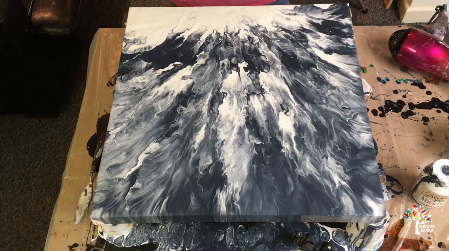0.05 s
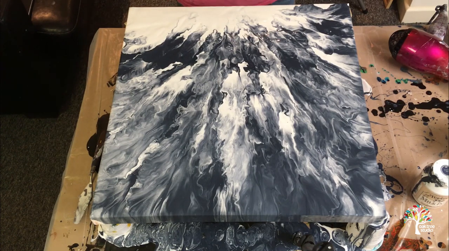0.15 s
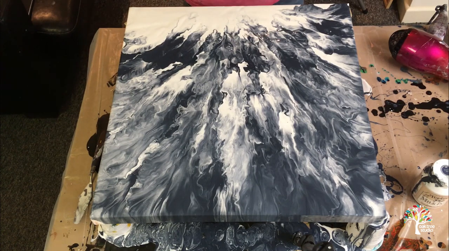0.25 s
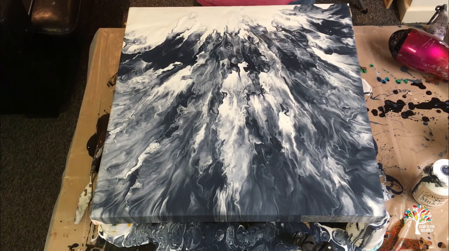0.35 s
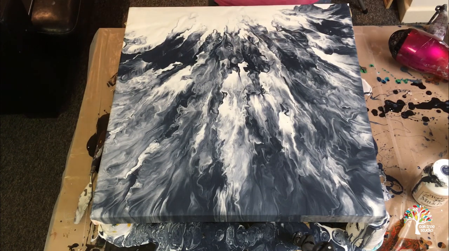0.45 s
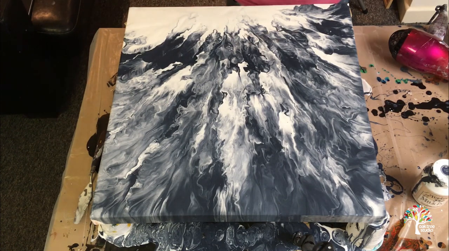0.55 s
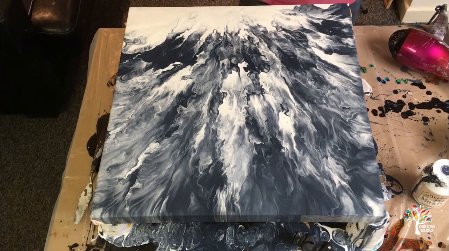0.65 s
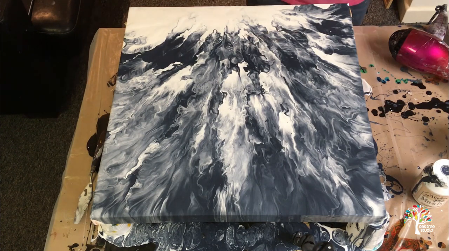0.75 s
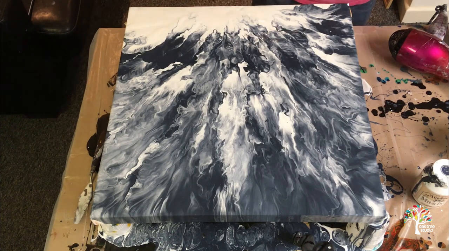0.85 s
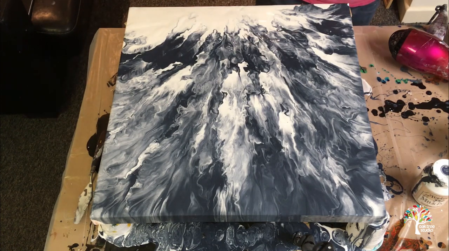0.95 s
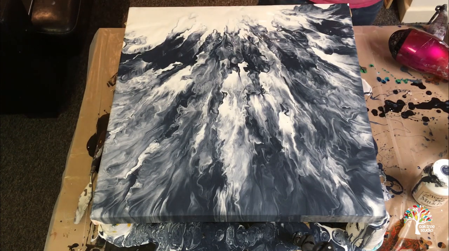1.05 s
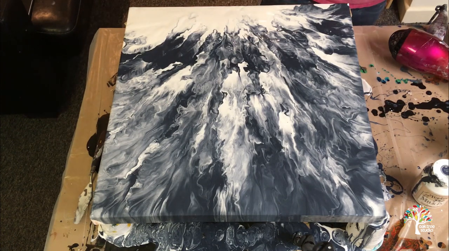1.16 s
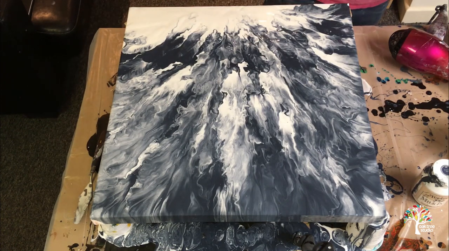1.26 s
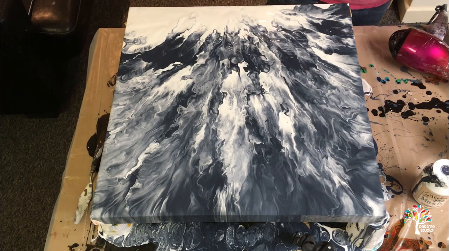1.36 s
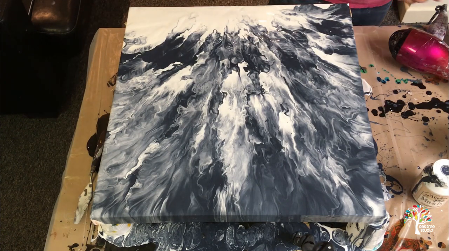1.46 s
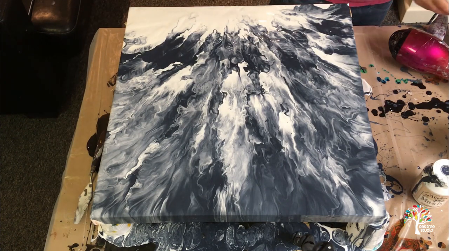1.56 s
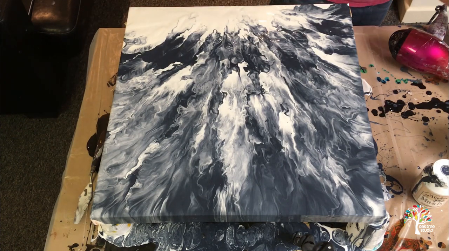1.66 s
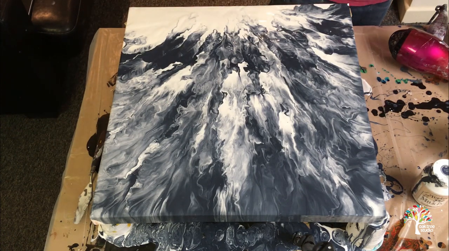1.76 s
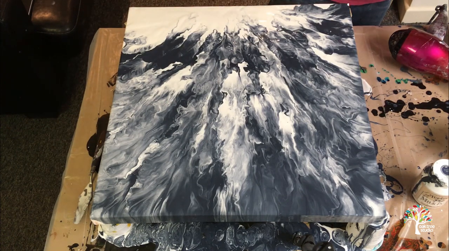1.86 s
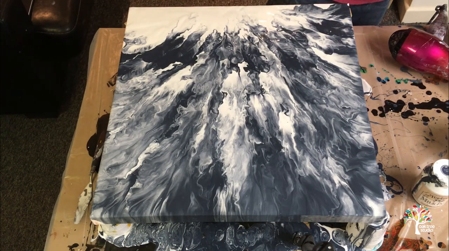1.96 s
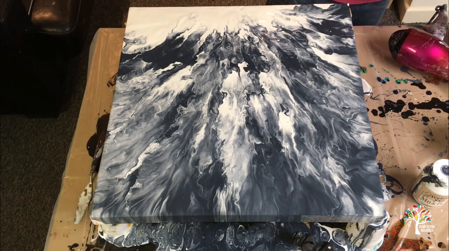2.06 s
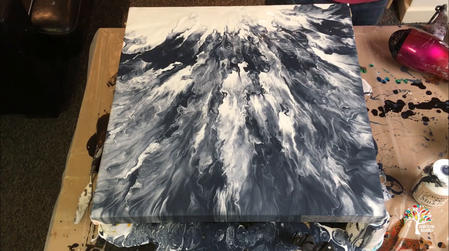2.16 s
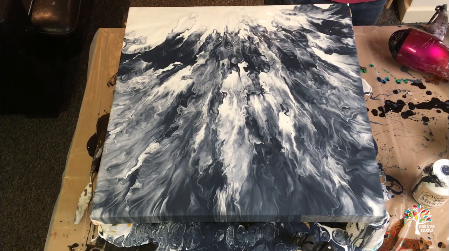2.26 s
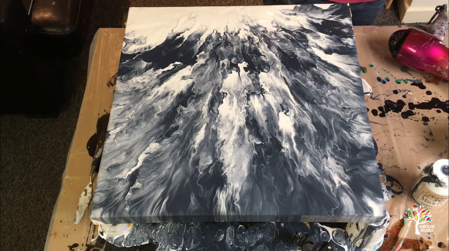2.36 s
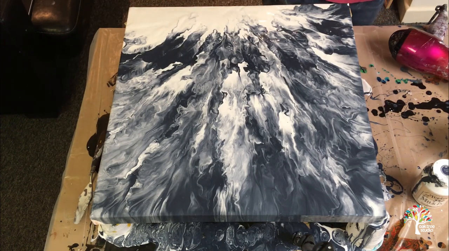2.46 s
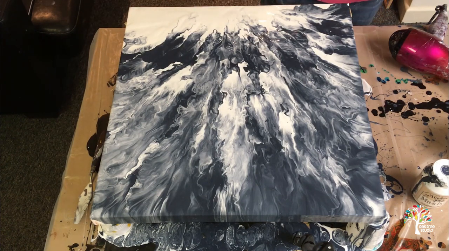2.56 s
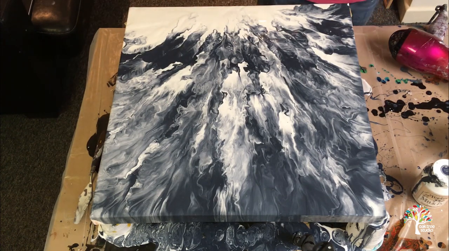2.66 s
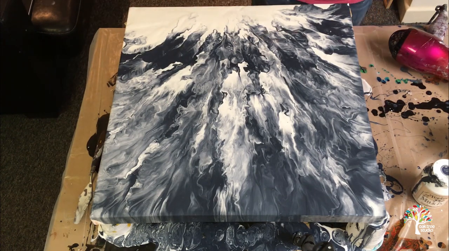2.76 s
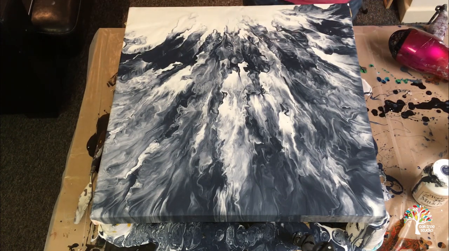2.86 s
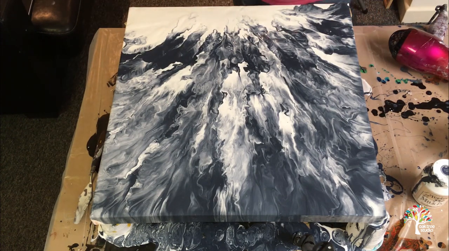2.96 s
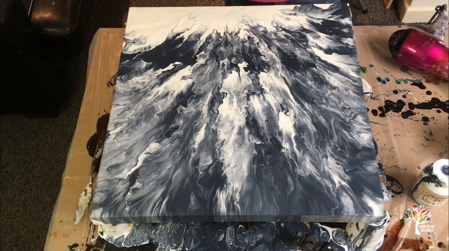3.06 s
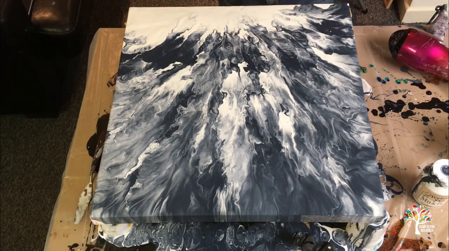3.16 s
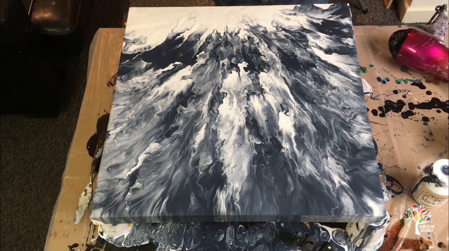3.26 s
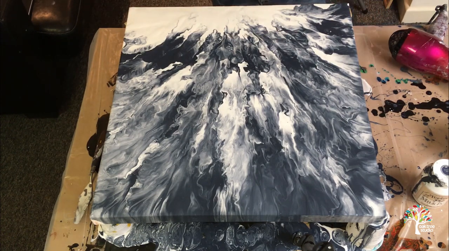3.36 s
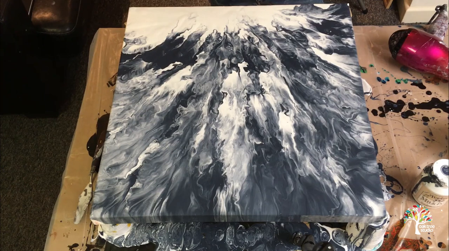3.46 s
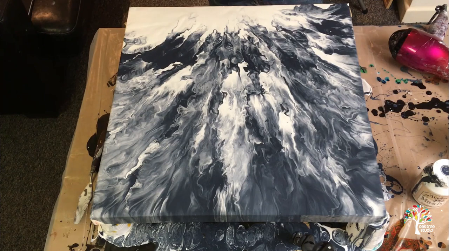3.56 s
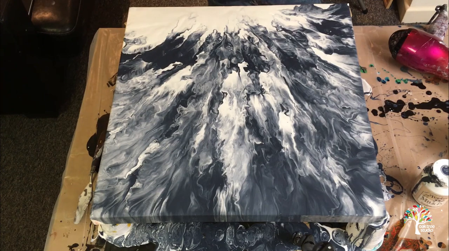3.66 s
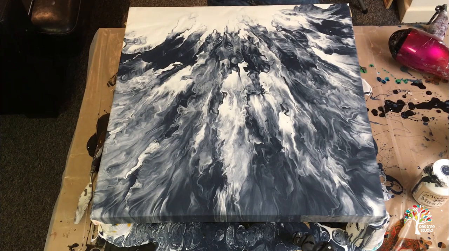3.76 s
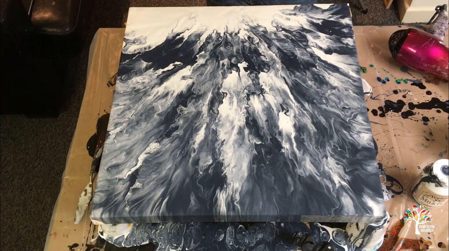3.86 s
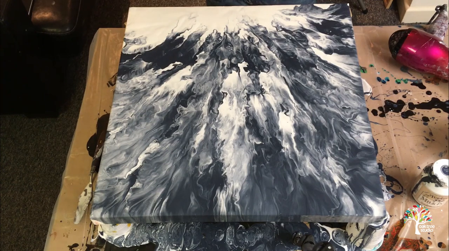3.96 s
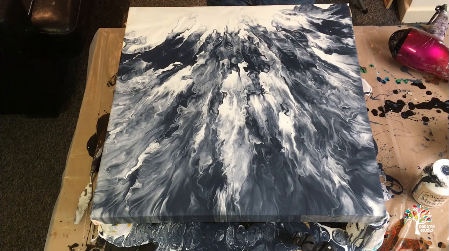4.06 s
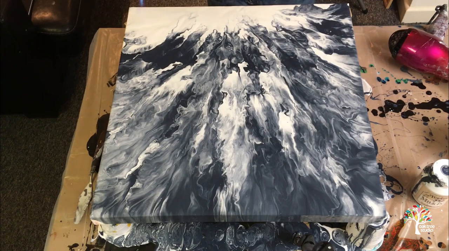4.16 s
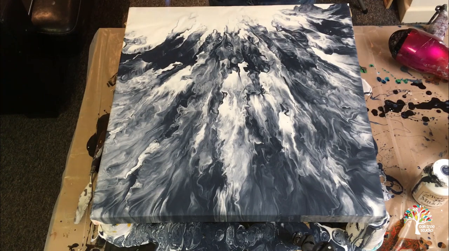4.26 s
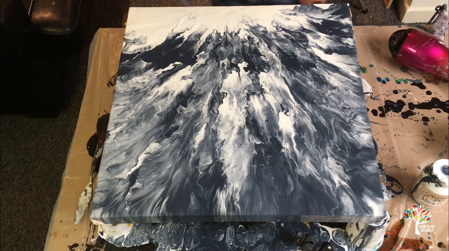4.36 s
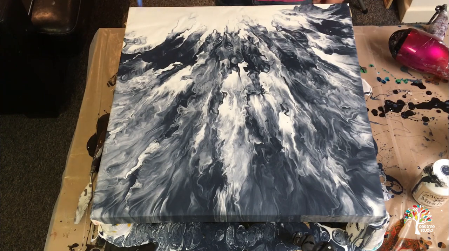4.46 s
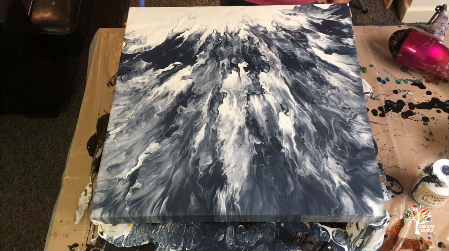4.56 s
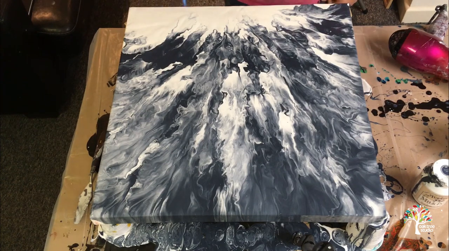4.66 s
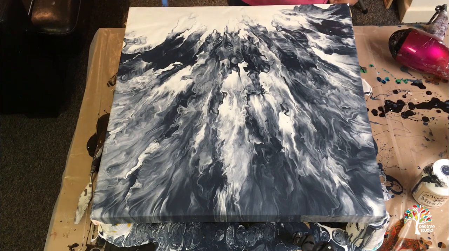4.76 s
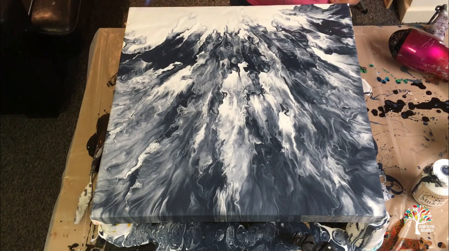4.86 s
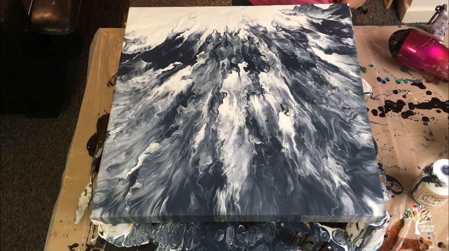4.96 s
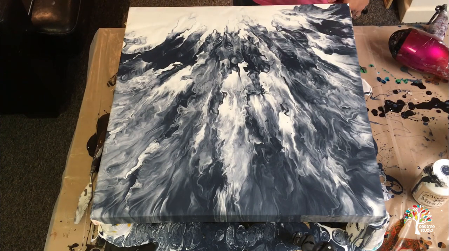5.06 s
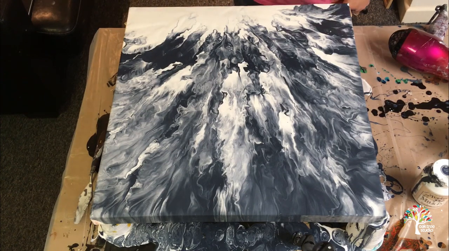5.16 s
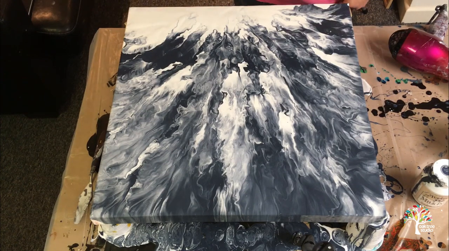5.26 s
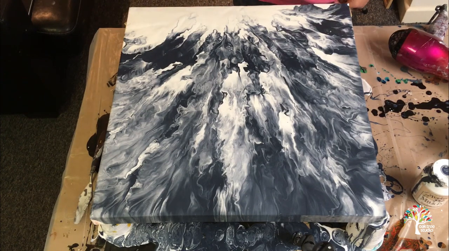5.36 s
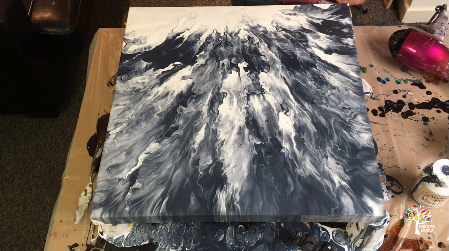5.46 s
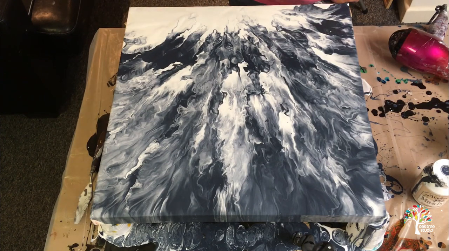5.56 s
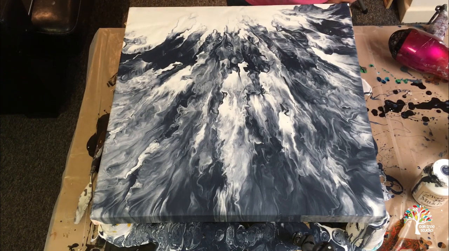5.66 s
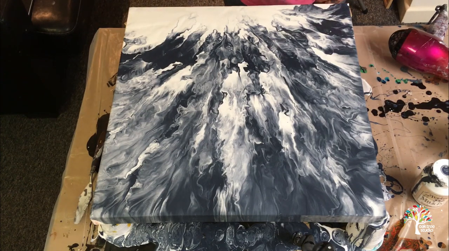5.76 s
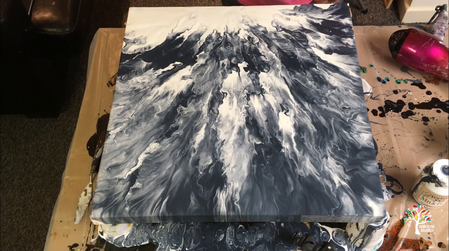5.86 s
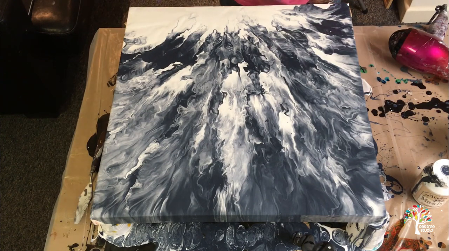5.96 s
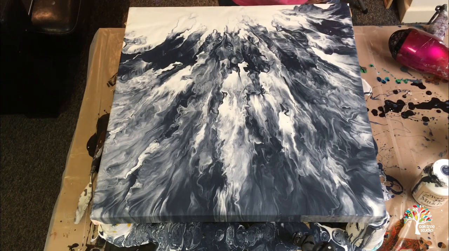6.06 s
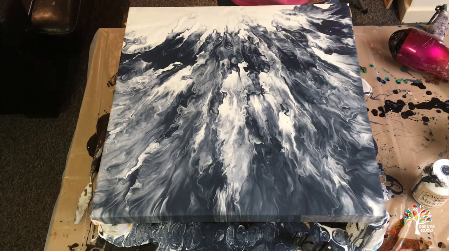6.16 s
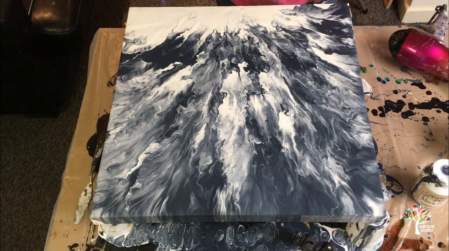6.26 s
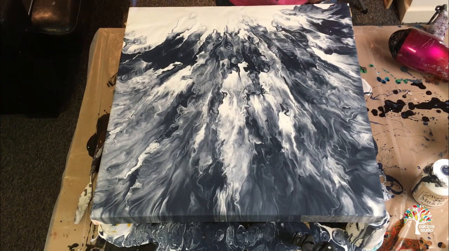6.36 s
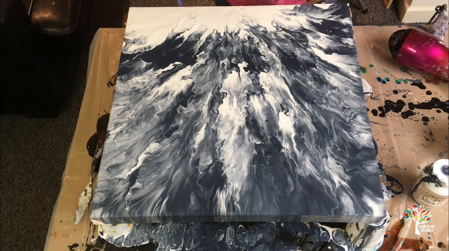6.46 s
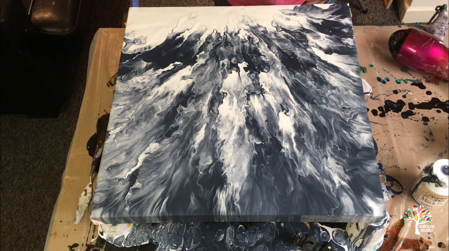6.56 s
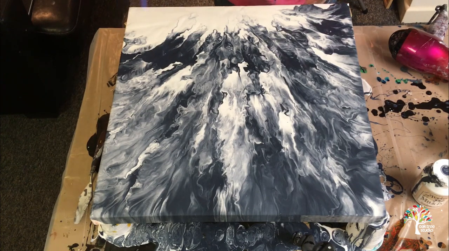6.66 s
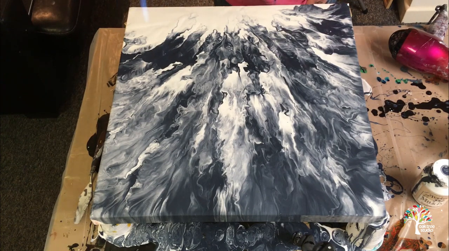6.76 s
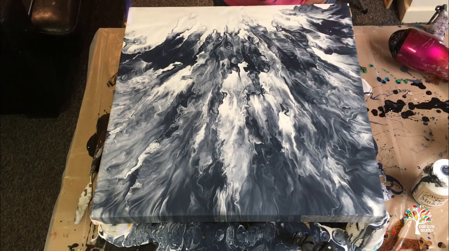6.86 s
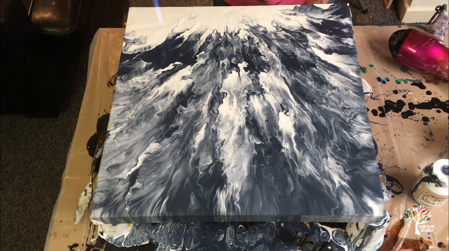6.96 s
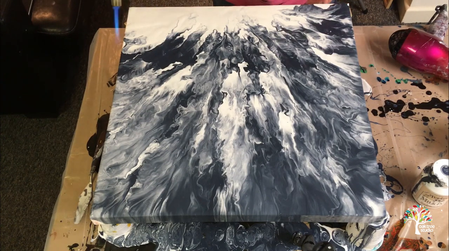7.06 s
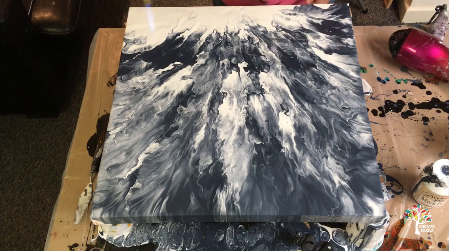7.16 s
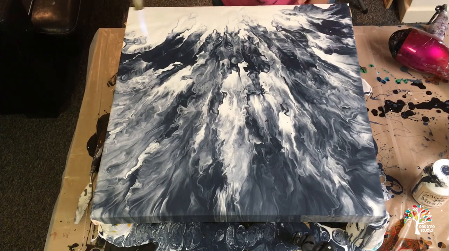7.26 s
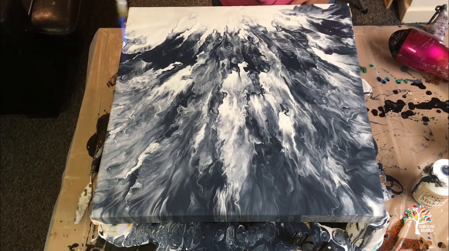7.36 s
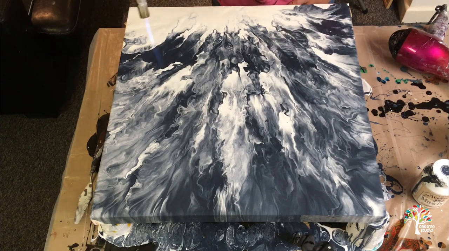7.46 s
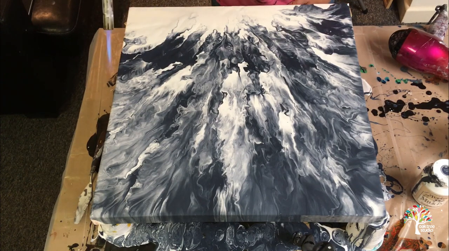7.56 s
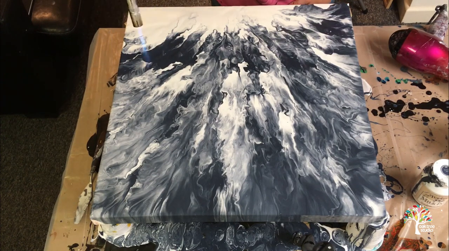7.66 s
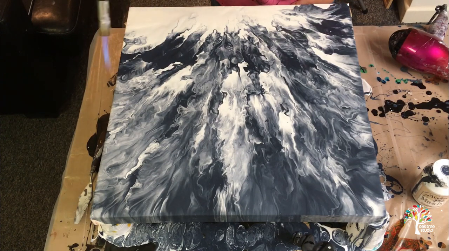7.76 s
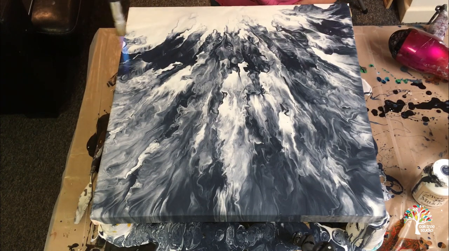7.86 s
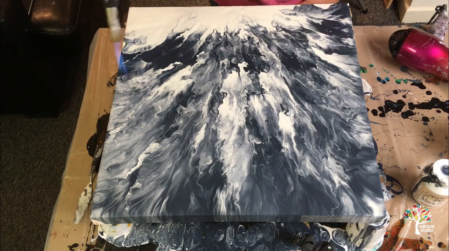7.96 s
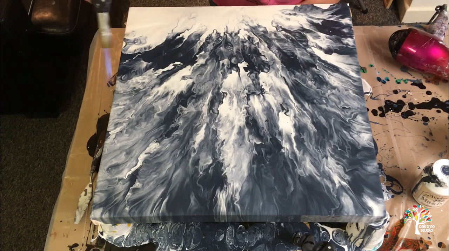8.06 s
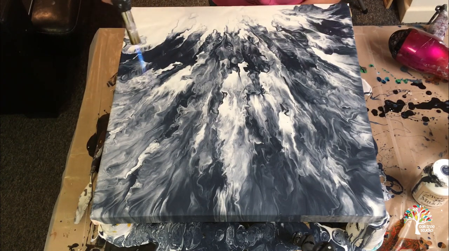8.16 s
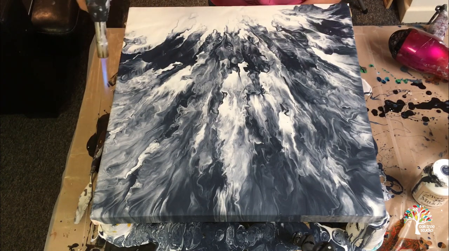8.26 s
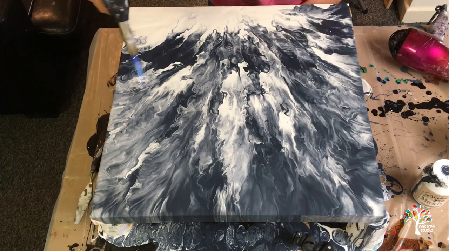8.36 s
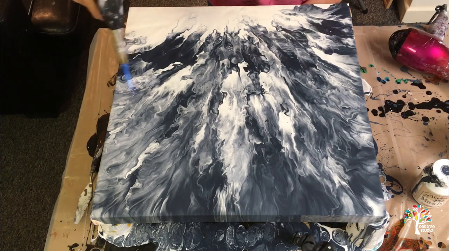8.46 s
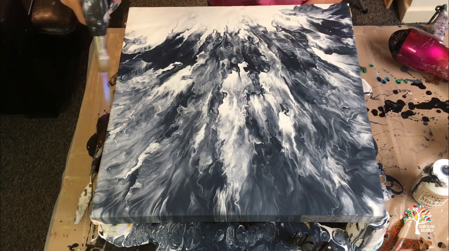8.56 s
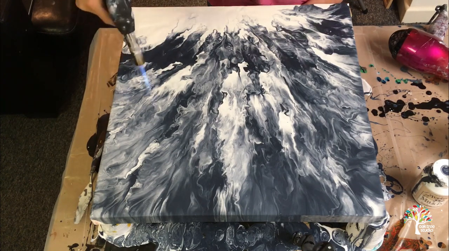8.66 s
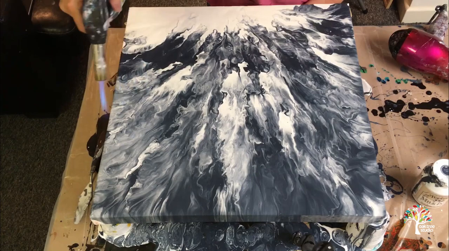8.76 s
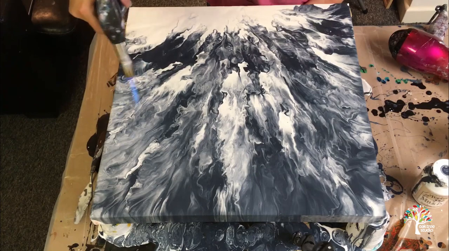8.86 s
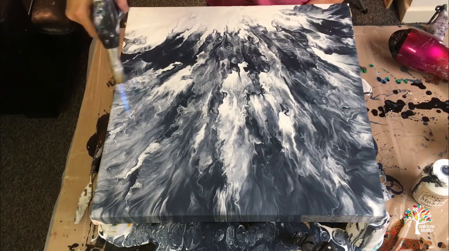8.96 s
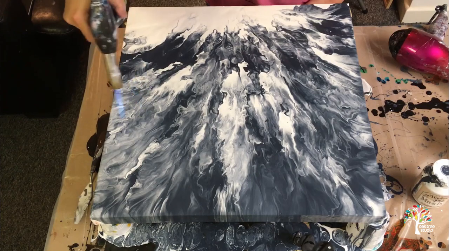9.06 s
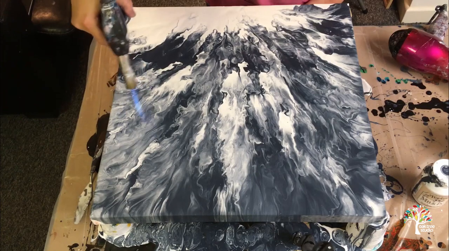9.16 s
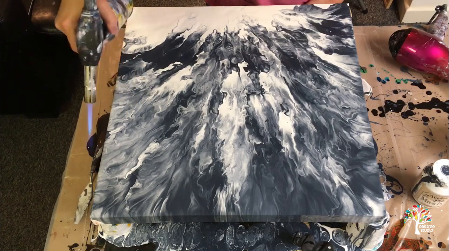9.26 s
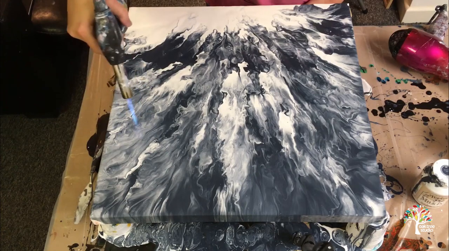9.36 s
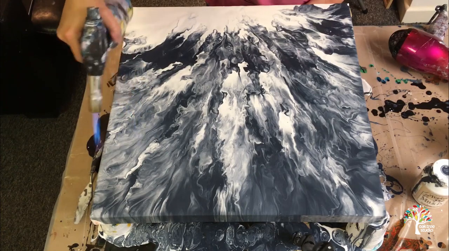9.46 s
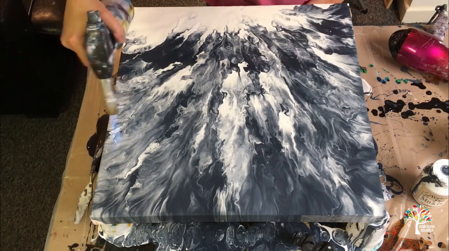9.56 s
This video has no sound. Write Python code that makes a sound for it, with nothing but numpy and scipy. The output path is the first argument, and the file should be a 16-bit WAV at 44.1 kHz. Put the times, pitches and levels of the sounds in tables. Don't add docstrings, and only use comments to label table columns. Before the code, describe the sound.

In a small humming room, a hand shifts its grip on a metal gas canister with soft skin rubs, dry ticks and faint rings. A valve opens with bright hiss, then a violent igniter snap overloads the close microphone into a split-second silence. The gas thumps alight and the flame roars, puffing and fluttering about eight times a second until the end.

```python
import sys
import numpy as np
from scipy import signal
from scipy.fft import rfft, irfft, next_fast_len
from scipy.io import wavfile
from scipy.ndimage import uniform_filter1d

SR = 44100
rng = np.random.default_rng(int(sys.argv[2]) if len(sys.argv) > 2 else 0)


def volts(x):
    e = np.asarray(x, float) / 20
    return 10 ** e


def persist_wave(psi):
    counts = np.round(np.clip(psi, -1, 1) * 32767).astype(np.int16)
    wavfile.write(sys.argv[1], SR, np.atleast_2d(counts).T)


N = 424683
T = np.arange(N) / SR
M = next_fast_len(N)
HZ = np.fft.rfftfreq(M, 1 / SR)
# (start t/s, end t/s)
BEFORE, SPARK, AFTER = (0, 4.1), (3.7, 4.4), (4.0, N / SR)


def evened(x):
    return x / np.sqrt(np.mean(x ** 2) + 1e-20)


def read(points, hz=HZ):
    f, value = np.transpose(points)
    return np.interp(np.log(hz + 1), np.log(f + 1), value)


def bumps_db(modes):
    return sum(db * np.exp(-2 * ((HZ - hz) / width) ** 2) for hz, width, db in modes)


def colour(x, colour_db):
    return irfft(rfft(x, M) * volts(colour_db), M)[..., :N]


def curve(rows, order, edge_db=-100.0):
    rows = np.array(rows)
    return volts(np.interp(T, rows[:, 0], rows[:, order], edge_db, edge_db))


def noise(colour_db, span, patchy_db=0.0, crackle=0.0, flicker_db=0.0):
    first, last = round(span[0] * SR), round(span[1] * SR)
    size = next_fast_len(last - first)
    struck = rng.random(size) < 500 / SR
    grains = volts(2.2 * np.minimum(rng.exponential(1, size), 4)) * struck
    white = rng.standard_normal(size)
    white = white + crackle * evened(grains) * np.sign(white)
    z = signal.stft(white, nperseg=256)[2]
    patches = uniform_filter1d(rng.standard_normal(z.shape), size=4, axis=0)
    patches = evened(uniform_filter1d(patches, size=40, axis=1))
    flicker = evened(uniform_filter1d(rng.standard_normal(z.shape[1]), size=3))
    z = z * volts(patchy_db * patches + flicker_db * flicker)
    white = signal.istft(z, nperseg=256)[1][:size]
    gain = volts(np.interp(np.fft.rfftfreq(size, 1 / SR), HZ, colour_db))
    coloured = irfft(rfft(white) * gain, size)[:last - first]
    return np.pad(evened(coloured), (first, N - last))


# (f/Hz, width/Hz, level/dB)
ROOM_MODES = [(61.5, 6, 0), (76.5, 12, 5), (103.5, 13.6, 9.5), (123.4, 11.6, 4), (160.6, 15, 7),
              (188, 15, -2), (200, 16, 2.5), (238.5, 17, -4.5), (288, 13, 2.5), (333.6, 24, 5.5),
              (384, 23, 6.5), (463, 9.2, 4), (556, 38, 6), (647, 27, 5), (896, 53, 2.5), (980, 150, 2.5)]
# (f/Hz, level/dB per Hz)
HUM_COLOUR = [(12, -57), (28, -32), (45, -7), (90, -9.5), (125, -3.5), (165, -8), (235, -16), (400, -30.5),
              (1000, -36), (2000, -43.5), (4000, -46), (8000, -47), (16000, -46.5)]


def room_tone():
    hum = noise(read(HUM_COLOUR) + bumps_db(ROOM_MODES), (0, N / SR), patchy_db=-1.2)
    return volts(-48) * hum


def room(x):
    t = T[:12000]
    tails = rng.standard_normal((3, len(t))) * volts(-60 * t / 0.14) * (t > 0.003)
    tails = signal.lfilter([1], [1, -0.55], tails)
    fades = np.sqrt(2 / 3) * np.cos(np.pi * (0.7 * T - np.arange(3)[:, None] / 3))
    tails = tails / np.linalg.norm(tails[0])
    wet = signal.oaconvolve(x * fades, tails, axes=1)[:, :N].sum(0)
    return x + volts(-10.5) * wet


def strokes(rows):
    t = T[T < BEFORE[1]][::40]
    s, db, rise, fall = np.transpose(rows)[..., None]
    drop_db = np.where(t < s, rise * (s - t), fall * (t - s))
    power = volts(2 * (db - drop_db)).sum(0)
    return np.interp(T, t, np.sqrt(power))


# (peak t/s, length/s, shuffle level/dB, rustle level/dB, thud level/dB)
GRIPS = [(0.027, 0.33, -65, -55.5, -78), (0.19, .16, -80, -61, -68), (0.448, 0.19, -53, -63, -56),
         (0.47, 0.13, -58, -80, -70), (0.612, 0.089, -59, -67, -74), (0.39, 0.052, -60, -80, -70),
         (0.904, 0.14, -64, -90, -55), (1.085, .03, -70, -56, -70), (1.116, 0.13, -56.5, -52, -41.5),
         (1.165, .08, -66, -65, -70), (1.39, 0.44, -62, -78, -51), (1.59, 0.098, -58.5, -79, -66),
         (1.72, 0.083, -59, -86, -69), (1.848, 0.34, -70, -70, -51), (2.03, 0.11, -63, -60, -70),
         (2.1, 0.2, -62, -59.5, -55), (2.312, 0.23, -61, -87, -46), (2.486, 0.027, -65, -40.5, -70),
         (2.516, 0.13, -63, -52.5, -65), (2.544, 0.072, -58, -80, -70), (2.57, 0.092, -66, -54.5, -70),
         (2.624, .12, -69, -56, -66), (2.698, .04, -59, -58, -75), (2.854, 0.45, -69, -72, -55),
         (3.074, .12, -64, -74, -63), (3.21, 0.026, -57, -51, -64), (3.28, 0.11, -66, -71, -68)]


def grips(order):
    fall_db, rise_share = 21.5, 0.33
    return strokes([(g[0], g[order], fall_db / (rise_share * g[1]), fall_db / g[1]) for g in GRIPS])


# (f/Hz, level/dB per Hz)
SHUFFLE_COLOUR = [(250, -41), (600, 6.5), (1100, 6), (2300, -4), (3500, -8.5), (5000, -19), (9000, -33)]
RUSTLE_COLOUR = [(1500, -18), (4000, -11.5), (8000, -6.5), (13000, -4), (16000, -3)]
# (f/Hz, width/Hz, level/dB)
CANISTER = [(2600, 90, 5), (3320, 66, 8), (5970, 190, 7), (8700, 200, -3), (11300, 150, 9)]
# (f/Hz, level/dB per Hz)
BODY_COLOUR = [(150, -36), (230, -2.5), (330, -9), (420, -2.5), (520, -7), (800, -42.5)]
# (peak t/s, level/dB, rise/dB per s, fall/dB per s)
DRAG = (0.16, -60, 45, 190)
# (f/Hz, level/dB per Hz)
DRAG_COLOUR = [(1500, -14), (2200, -13), (6500, -7), (8000, -19)]
# (f/Hz, width/Hz, level/dB)
DRAG_RING = [(2170, 150, 8), (2600, 400, 12), (5200, 120, 2), (5900, 170, 9.3), (6500, 150, 2)]
# (peak t/s, level/dB, rise/dB per s, fall/dB per s)
SCUFFS = [
    (1.47, -75, 150, 40),
    (1.59, -71, 200, 150),
]
# (peak t/s, level/dB, rise/dB per s, fall/dB per s)
CREAKS = [
    (3.792, -76, 60, 200),
    (3.872, -68, 350, 400),
    (4.03, -67, 50, 300),
]


def handling():
    dull = grips(order=2) * noise(read(SHUFFLE_COLOUR), BEFORE, patchy_db=1.5, crackle=0.4)
    rustle_db = read(RUSTLE_COLOUR) + bumps_db(CANISTER)
    bright = grips(order=3) * noise(rustle_db, BEFORE, patchy_db=1.2, crackle=0.63, flicker_db=2.0)
    thud = grips(order=4) * noise(read(BODY_COLOUR), BEFORE)
    drag = strokes([DRAG]) * noise(read(DRAG_COLOUR) + bumps_db(DRAG_RING), (0, 1))
    scuff = strokes(SCUFFS) * noise(bumps_db([(1500, 900, 26), (5400, 3200, 23)]), (1.2, 2.2))
    creak = strokes(CREAKS) * noise(bumps_db([(1080, 260, 45)]), BEFORE)
    return volts(-4.5) * dull + volts(-0.5) * bright + volts(-15.5) * thud + drag + creak + scuff


# (t/s, peak level/dB, dull share/dB, bright share/dB)
TICKS = [(0.025, -48, -25, -8), (0.042, -50, -25, -7), (0.056, -47, -25, -7), (0.2329, -48, -18, -12),
         (0.368, -47, -14, -8), (0.425, -50, -8, -30), (0.438, -42, -6, -30), (0.449, -39.5, 0, -14),
         (1.0765, -46, -22, -5), (1.308, -53, -25, -6), (1.109, -31, -10.5, -7), (1.169, -41, -10, -10),
         (2.009, -45, -19, -5), (2.038, -43, -19, -6), (2.0785, -30, -23, -8.5), (2.094, -44, -8, -18),
         (2.197, -45, -12, -9), (2.482, -39, -26, -4), (2.559, -45, -18, -11), (2.619, -46, -19, -4),
         (2.7053, -38, -22, -9.5), (2.759, -49, -16, -5), (2.82, -54, -25, -11), (3.1, -49, -6, -26),
         (3.202, -27.5, -9.5, -6.5), (3.791, -24, -12, 0)]
# (t/s, f/Hz, level/dB, t60/s)
RINGS = [(0.234, 3170, -61, 0.21), (0.235, 3480, -63, .1), (.4, 5950, -66, .06), (.426, 1110, -57, .05),
         (.4365, 1010, -47, .04), (.4375, 1800, -50, 0.033), (.446, 1150, -59, .04),
         (.455, 2100, -53, 0.15), (.878, 650, -58, .03), (.9, 1700, -68, .1), (1.71, 700, -61, .1),
         (1.353, 3140, -63, .07), (1.353, 1900, -67, .1), (1.588, 1020, -62, .1), (3.203, 3350, -51, 0.078),
         (3.21, 2850, -64, .3), (3.225, 3700, -66, .25), (2.5, 6070, -70, .5), (1.584, 2900, -65, 0.12),
         (1.108, 2460, -55, 0.22), (1.108, 3400, -58, .25), (2.079, 1480, -58, 0.091),
         (2.481, 2480, -63, .05), (2.485, 3340, -73, 0.37), (2.541, 1026, -57, 0.15),
         (2.667, 1270, -56, .07), (2.698, 1270, -66, .05), (3.79, 1156, -49, 0.055),
         (3.793, 2600, -56, 0.13)]


def ticks():
    t = T[:9000]
    envelope, out = np.zeros((2, N + len(t))), np.zeros(N + len(t))
    decay = volts(-60 * t / 0.012) + volts(-17 - 60 * t / 0.3)
    crack = np.clip(t / 0.0005, 0, 1) * decay
    for s, db, dull_db, bright_db in TICKS:
        peaks = volts(db + np.array([[dull_db], [bright_db]]))
        envelope[:, round(s * SR):][:, :len(t)] += peaks * crack
    waver = uniform_filter1d(rng.standard_normal((len(RINGS), 2, len(t))), size=130)
    share = 0.55
    for (s, hz, db, t60), (a, b) in zip(RINGS, waver):
        phase = 2 * np.pi * hz * t
        ring = (1 + share * evened(a)) * np.sin(phase) + share * evened(b) * np.cos(phase)
        out[round(s * SR):][:len(t)] += volts(db - 60 * t / max(t60, 0.01)) * ring
    dull_db = read([(400, -18), (900, -7.0), (2500, -4.5), (4000, -3.0), (6000, -23), (9000, -42)])
    bright_db = read([(3000, -29), (6000, -1.0), (12000, -3.0), (16000, 0.0)])
    cracks = envelope[0, :N] * noise(dull_db, BEFORE) + envelope[1, :N] * noise(bright_db, BEFORE)
    return out[:N] + volts(-4.5) * cracks


# (t/s, flow level/dB, aim as top band level/dB)
JET = [
    [(3.22, -86, -4), (3.3, -67.5, -2), (3.36, -58.5, -1), (3.45, -57, 6), (3.7, -56, 6), (3.78, -56, 6),
     (3.83, -75, 6)],
    [(3.75, -75, 7), (3.8, -53.5, 4), (3.9, -56, 8), (4.05, -56.5, 12)],
    [(4.07, -56, -8), (4.5, -56.5, -6), (6.0, -57, -10), (6.5, -56.5, -8), (7.35, -56.5, -6),
     (7.5, -55.5, -4), (8.2, -55, -2), (8.3, -57, -8), (8.9, -56.5, -4), (9.2, -53, -8), (9.63, -56, -5)],
]
# (f/Hz, level/dB per Hz)
JET_COLOUR = [(250, -50), (900, -8), (2000, -7.5), (4000, -13.5), (8000, -4), (16000, -0.5)]
# (f/Hz, width/Hz, level/dB)
COLD_NOZZLE = [(2880, 580, 11.5), (3590, 350, 13), (4380, 590, 16.5), (5720, 480, 16), (6450, 560, 17.5),
               (7300, 500, 7), (8850, 700, 8), (9650, 600, 7.5), (11300, 720, 6), (12100, 600, 4),
               (13900, 700, 8)]
SQUEEZED_NOZZLE = [(2870, 460, 7), (3590, 500, 12), (4400, 550, 14), (5670, 420, 11), (6400, 670, 15),
                   (7200, 500, 6), (8650, 700, 10), (9650, 600, 8), (11500, 1000, 5), (12200, 500, 5),
                   (12750, 400, -4), (14100, 900, -1)]
LIT_NOZZLE = [(5900, 550, 14), (8650, 900, 11.5), (9700, 500, 8), (11400, 600, 3.5), (12450, 700, 9),
              (13500, 450, -4), (14000, 520, 12.5), (14600, 560, 13)]
# (t/s, level/dB, f/Hz)
WHISTLES = [
    [(3.36, -75, 14900), (3.44, -56, 14700), (3.52, -55, 14000), (3.7, -60, 13800), (3.8, -72, 13900)],
    [(3.85, -75, 11300), (3.93, -53, 11500), (3.99, -57, 12100), (4.045, -60, 12400)],
]


def jet():
    out = np.zeros(N)
    top = 1 / (1 + (13450 / (HZ + 1)) ** 60)
    nozzles = (COLD_NOZZLE, SQUEEZED_NOZZLE, LIT_NOZZLE)
    for rows, nozzle, span in zip(JET, nozzles, (BEFORE, SPARK, AFTER)):
        hiss = noise(read(JET_COLOUR) + bumps_db(nozzle), span, patchy_db=1.8, flicker_db=0.5)
        top_hiss = irfft(rfft(hiss, M) * top, M)[:N]
        aim = volts(0.5) * curve(rows, order=2, edge_db=-3.0)
        out += volts(6.0) * curve(rows, order=1) * (hiss + (aim - 1) * top_hiss)
    for rows in WHISTLES:
        s, _, hz = np.transpose(rows)
        fuzz = evened(uniform_filter1d(rng.standard_normal(N), size=70))
        phase = 2 * np.pi * np.cumsum(np.interp(T, s, hz)) / SR
        out += curve(rows, order=1) * fuzz * np.cos(phase)
    return out


# (snap t/s, snap level/dB, snap length/s, t/s when the microphone recovers)
SNAP = (4.0452, -12.5, .0026, 4.0752)
# (f/Hz, level/dB per Hz)
SNAP_COLOUR = [(180, -59), (300, -33), (2000, -8), (3300, -5), (4830, -5), (5800, -7), (9710, 3),
               (10900, 0), (13100, -2.5), (15500, -5), (16000, -35)]
ECHO_COLOUR = [(35, -46), (60, 0), (156, -14), (301, -17), (621, -9), (1300, -7), (1700, -11), (2900, -6.5),
               (3420, -3.5), (5210, -6), (6280, -3.5), (15500, -6.5), (16000, -20)]
# (f/Hz, width/Hz, level/dB)
SPRING = [(1680, 220, 14), (3400, 470, 7.5), (4300, 200, 7.5), (5200, 700, 0.5), (6190, 300, 8.5),
          (6900, 250, 11.5), (8500, 300, 3), (9500, 1200, 4.5), (12200, 500, 6.5), (15500, 600, 2)]


def igniter():
    s, db, length, back = SNAP
    attack = np.clip((T - s - 0.0005) / 0.00015, 0, 1)
    burst = volts(db) * ((T > s) & (T < s + length)) * attack
    u = np.maximum(T - back, 0)
    echo_db = -22 + 5 * np.exp(-(u / 0.0079) ** 4) - 257 * u
    spring_stop_db = -17 * np.clip((T - 4.121) / 0.0052, 0, 1)
    far_walls = volts(-39.5 - 113 * u)
    fading = (volts(echo_db + spring_stop_db) + far_walls) * (T > s + length)
    echo = fading * noise(read(ECHO_COLOUR) + bumps_db(SPRING), SPARK, patchy_db=1.0)
    snap = burst * noise(read(SNAP_COLOUR), SPARK)
    return snap * np.linalg.norm(burst) / np.linalg.norm(snap) + echo


# (t/s, low f/Hz, high f/Hz, level/dB, t60/s)
WHOOMP = (4.0755, 82, 128, -34, .25)
# (t/s, level/dB, f/Hz)
BANGS = [
    (5.925, -31.5, 920),
    (8.3465, -29, 1080),
    (8.473, -31, 850),
    (8.598, -35, 890),
]


def thumps():
    s, low_hz, high_hz, db, t60 = WHOOMP
    u = np.maximum(T - s, 0)
    beat = np.sin(2 * np.pi * high_hz * u) - np.sin(2 * np.pi * low_hz * u)
    out = volts(db - 60 * u / t60) * beat
    t = T[:900]
    for s, db, hz in BANGS:
        bang = volts(db - 60 * t / 0.022) * np.sin(2 * np.pi * hz * t)
        out[round(s * SR):][:900] += bang
    return out


# (t/s, strength level/dB, nearness to the microphone 0-1)
FLAME = [(4.08, -2.5, 0), (4.3, 2, 0), (4.53, 1.5, 0.2), (4.66, 2.5, 0.57), (4.77, 1.5, 0.1),
         (4.88, -1.5, 0.46), (5.2, -0.5, 0), (6.27, -0.5, 0.1), (6.62, -1.5, 0.22), (6.9, -0.5, 0.38),
         (7.43, -0.5, 0.43), (7.88, -0.5, 0.27), (9.21, 0, 0.53), (9.63, -0.5, 0.37)]


def layer(base_db, share, near_db, bloom_db):
    s, strength, near = np.transpose(FLAME)
    bloom_s = 0.033
    bloom = np.exp(-(np.maximum(T - SNAP[3], 0) / bloom_s / 2) ** 2)
    steady_db = np.interp(T, s, share * strength + near_db * near)
    return volts(base_db + steady_db + bloom_db * bloom)


def steadied(x, share):
    surge = uniform_filter1d(x ** 2, size=1300) + 0.05
    return evened(x / surge ** (share / 2))


# (start t/s, length/s, roar level/dB, fizz level/dB)
PUFFS = [(4.559, 0.08, -33.5, -45), (4.875, 0.062, -36, -45.5), (4.951, 0.05, -34, -43),
         (5.106, 0.068, -33, -46.5), (5.262, 0.03, -34.5, -44), (5.444, 0.098, -33.5, -44.5),
         (5.623, 0.055, -32, -44), (5.789, 0.047, -34, -50), (5.922, 0.049, -37.5, -48),
         (6.168, 0.035, -32.5, -43), (6.39, 0.052, -31, -43), (6.514, 0.06, -34.5, -53),
         (6.633, 0.058, -31.5, -41), (6.867, 0.055, -30.5, -44), (6.998, 0.04, -36, -48),
         (7.104, 0.073, -36.5, -47), (7.488, 0.051, -35, -45.5), (7.728, 0.04, -37.5, -47.5),
         (7.945, 0.052, -36.5, -54), (8.077, 0.036, -33, -43), (8.196, 0.049, -39.5, -55),
         (8.599, 0.043, -34.5, -44), (8.702, 0.055, -35.5, -50), (8.849, 0.037, -39, -47.5),
         (9.188, 0.06, -37, -48), (9.317, 0.03, -38.5, -48), (9.555, 0.025, -36, -41)]
# (start t/s, length/s, roar level/dB, fizz level/dB)
POPS = [(5.311, 0.025, -32.5, -46), (5.925, 0.0073, -36, -43.5), (6.556, 0.022, -32.5, -42.5),
        (8.343, 0.008, -33, -43.5), (8.472, 0.0073, -32, -47), (8.598, .01, -32.5, -44),
        (8.845, .01, -36.5, -48), (7.118, 0.0076, -30, -54), (7.726, 0.0072, -33.5, -54),
        (9.342, 0.0087, -31, -40)]
# (start t/s, length/s, roar level/dB, fizz level/dB)
FLUTTERS = [(4.41, 0.045, -38.5, -52), (4.615, .025, -48, -42.5), (4.785, 0.026, -48, -56),
            (6.062, 0.027, -41, -50), (6.29, 0.016, -37.5, -51), (6.759, .047, -40.5, -53),
            (7.267, 0.057, -39, -51.5), (7.39, 0.028, -36, -46.5), (7.615, 0.044, -40, -50.5),
            (7.855, 0.048, -44, -52), (8.35, 0.041, -36, -54), (8.485, 0.041, -39, -52),
            (8.755, 0.018, -37, -50), (9.02, 0.021, -56, -68), (9.086, 0.048, -39, -55),
            (9.225, .025, -44, -50), (9.428, 0.059, -41.5, -51)]
# (f/Hz, level/dB per Hz)
RUMBLE_COLOUR = [(40, -52), (90, -8.5), (130, -3), (190, -3.5), (260, -21), (400, -65)]
ROAR_COLOUR = [(250, -102), (450, -8), (600, -2), (850, -1.5), (1150, -5.5), (1600, -14), (2200, -22.5),
               (3500, -41)]
FIZZ_COLOUR = [(800, -53), (1500, -4), (2200, -1), (3500, -2.5), (5500, -7.5), (9000, -8.5), (16000, -10.5)]


def flame():
    calm = layer(base_db=-45.5, share=1.34, near_db=-0.5, bloom_db=7) ** 2
    roar = calm.copy()
    fizz = layer(base_db=-52, share=0.4, near_db=-3, bloom_db=14) ** 2
    for s, length, roar_db, fizz_db in PUFFS + POPS + FLUTTERS:
        span = slice(round((s - 0.05) * SR), round((s + 0.25) * SR))
        u = T[span] - s
        rise = 1 / (1 + np.exp(-u / (0.085 * length)))
        fall = 1 / (1 + np.exp((u - length) / (0.004 + 0.07 * length)))
        roar[span] += volts(2 * roar_db - 12.5) * rise * fall
        fizz[span] += volts(2 * fizz_db - 0.5) * rise * fall
    modes_db = 0.6 * bumps_db(ROOM_MODES)
    rumble = noise(read(RUMBLE_COLOUR) + modes_db, AFTER)
    out = layer(base_db=-49, share=-0.5, near_db=6.5, bloom_db=8.5) * rumble
    moved = np.pi / 2 * np.clip((T - 6.12) / 3.2, 0, 1)
    here = noise(read(BODY_COLOUR) + bumps_db([(300, 31, 1.0)]), AFTER)
    there = noise(read(BODY_COLOUR) + 2.4 * modes_db + bumps_db([(346, 40, 3.1)]), AFTER)
    body = np.cos(moved) * here + np.sin(moved) * there
    burning = layer(base_db=-51.5, share=0, near_db=9.5, bloom_db=6)
    out += burning * (roar / calm) ** 0.36 * body
    roar_db = read(ROAR_COLOUR) + 0.7 * modes_db
    roaring = noise(roar_db, AFTER, patchy_db=1.8, crackle=0.5, flicker_db=1.3)
    out += volts(-2.3) * np.sqrt(roar) * steadied(roaring, share=0.5)
    fizzing = noise(read(FIZZ_COLOUR), AFTER, patchy_db=1.5, crackle=0.49, flicker_db=1.23)
    out += np.sqrt(fizz) * fizzing
    return out * np.clip((T - SNAP[3]) / 0.023, 0, 1)


def scene():
    close = room_tone() + ticks() + igniter() + thumps()
    return (close + room(handling() + jet() + flame()))[None]


def roll_off(x):
    return signal.sosfilt(signal.butter(12, 16990, fs=SR, output="sos"), x)


# (f/Hz, width/Hz, level/dB)
MIC_DIPS = [(4160, 260, -2.5), (4850, 190, -3), (7200, 1170, -2.5), (9300, 250, -1.5), (10500, 710, -3),
            (13700, 500, 2)]


def record(dry):
    edge_db = -55 / (1 + np.exp(np.clip((15770 - HZ) / 18, -50, 50)))
    heard = colour(dry, bumps_db(MIC_DIPS) + edge_db)
    ceiling = 0.66
    s, _, length, back = SNAP
    alive = np.clip((s + length - T) / 0.0002, 0, 1) + np.clip((T - back) / 0.0005, 0, 1)
    mix = np.clip(heard, -ceiling, ceiling) * alive
    return roll_off(mix)


dry = scene()
out = record(dry)
persist_wave(out)
```